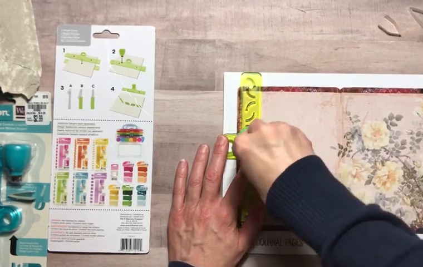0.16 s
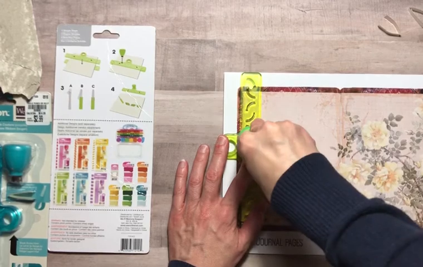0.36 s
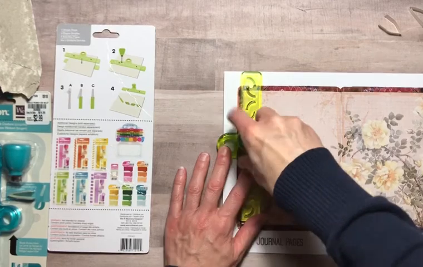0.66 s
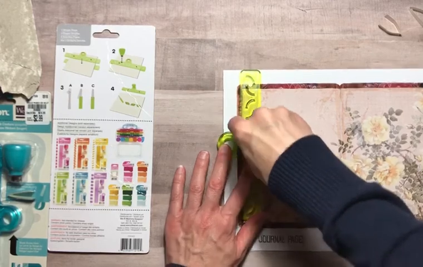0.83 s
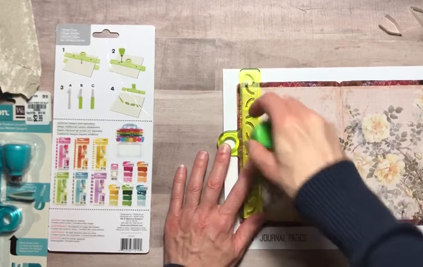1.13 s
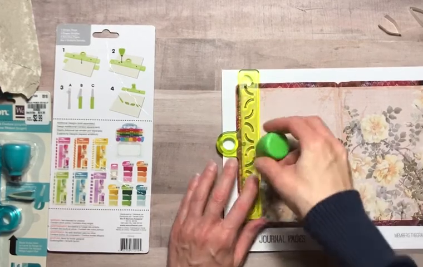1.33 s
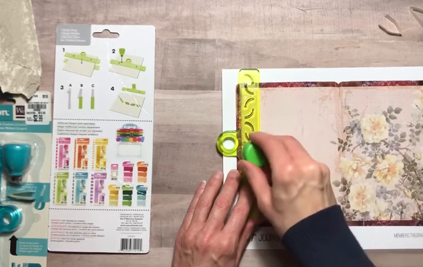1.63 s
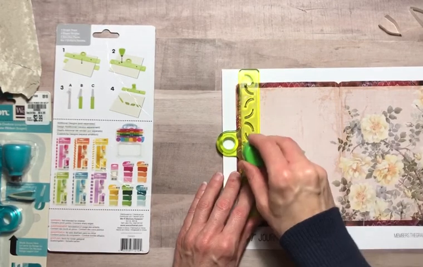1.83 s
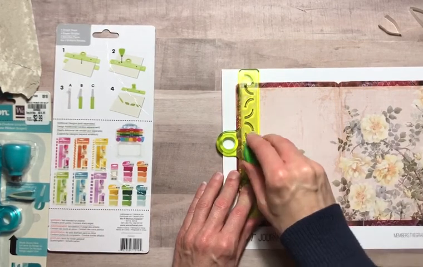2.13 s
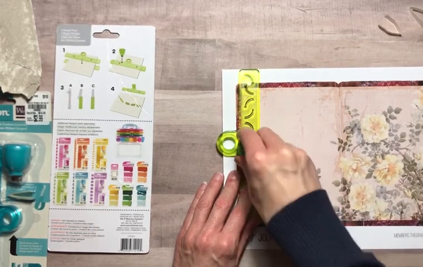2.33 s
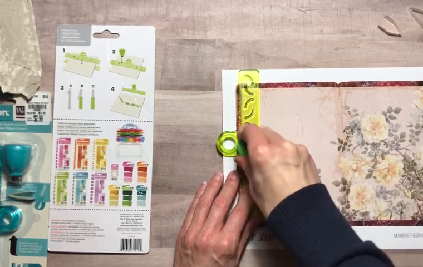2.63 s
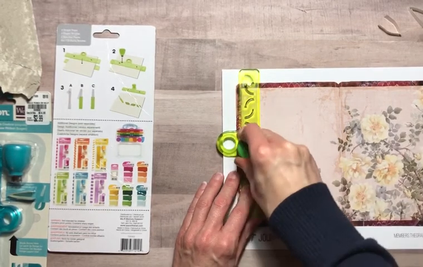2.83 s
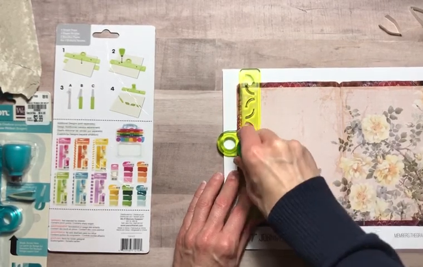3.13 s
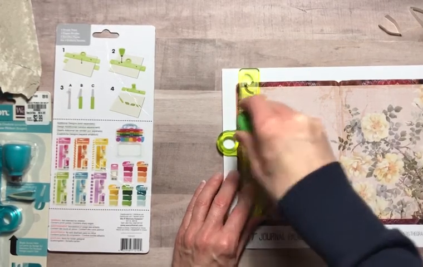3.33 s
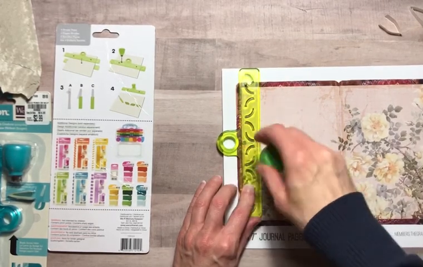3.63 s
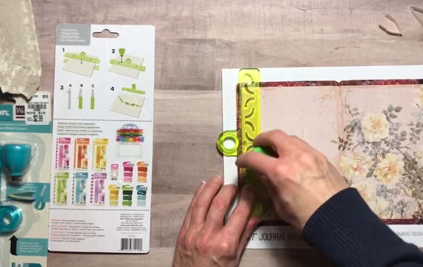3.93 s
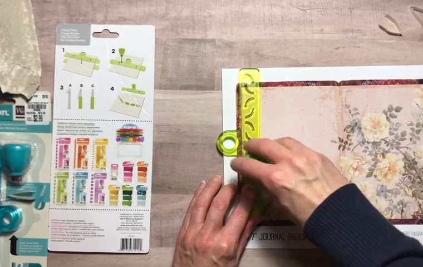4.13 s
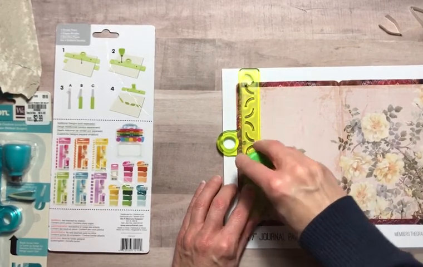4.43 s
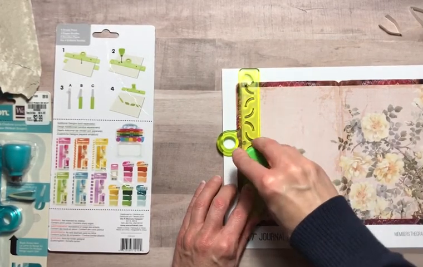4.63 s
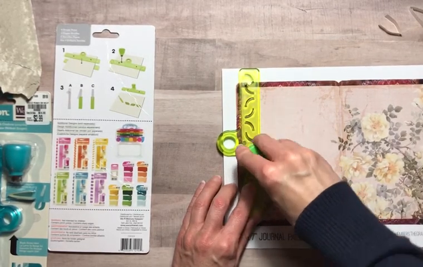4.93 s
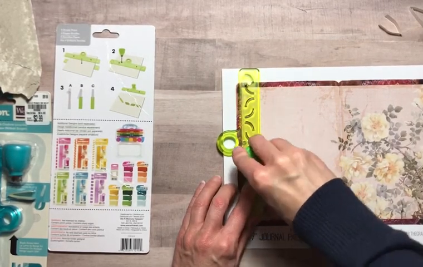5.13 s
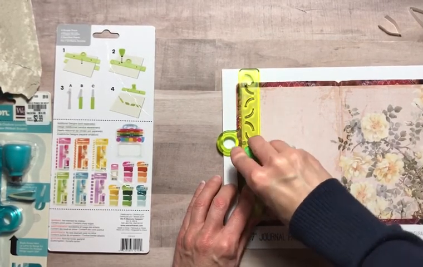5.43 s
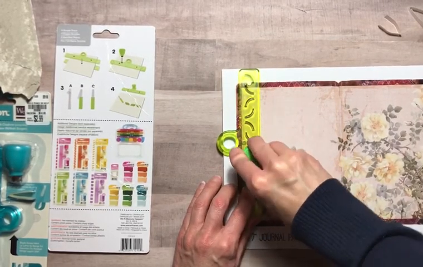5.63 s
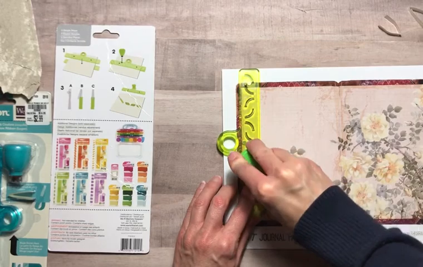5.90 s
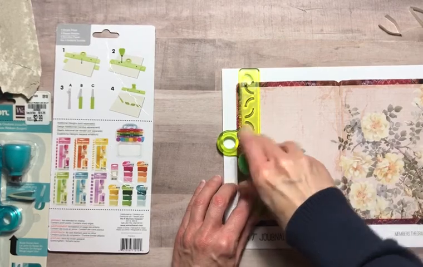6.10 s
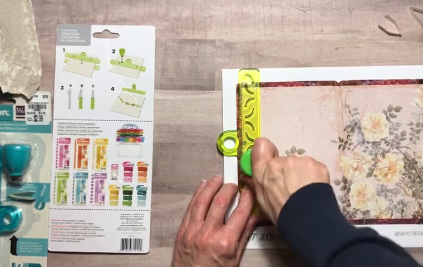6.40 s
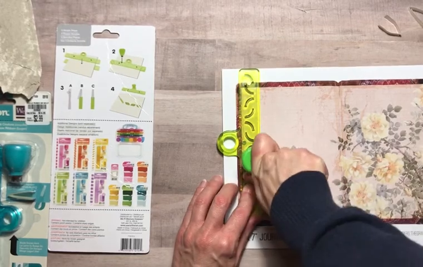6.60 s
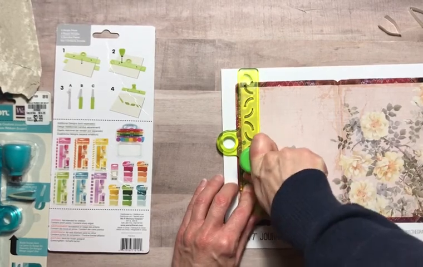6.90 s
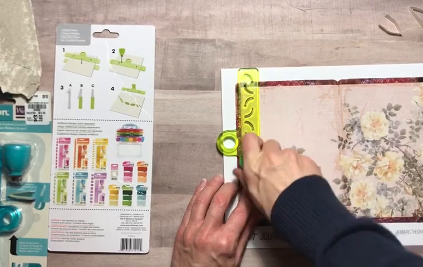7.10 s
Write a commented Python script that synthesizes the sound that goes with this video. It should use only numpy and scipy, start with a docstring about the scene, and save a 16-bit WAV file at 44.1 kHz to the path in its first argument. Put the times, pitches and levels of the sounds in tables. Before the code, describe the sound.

A hand punch snaps hard through thick paper three times on a table, with light plastic ticks, soft hand thuds and paper rustles between.

```python
"""Hand punch on a craft table

A hand punch is pressed three times through thick paper, close up: grainy noise crunches, then three contacts
of noise bursts and damped modes slam the tool onto the table, and a short diffuse tail makes a small room.
In between, the punch knocks in its plastic template (tick, ring and thud), hands bump the table, and paper
slides as band-shaped friction. Beneath lie low pushes of the table top, a hiss after each press and room tone."""
import sys
import numpy as np
from scipy import signal
from scipy.fft import rfft, irfft, next_fast_len
from scipy.io import wavfile

SR = 44100
rng = np.random.default_rng(int(sys.argv[2]) if len(sys.argv) > 2 else 0)


def master(y):
    """Save y as 16-bit WAV."""
    cut = np.clip(np.atleast_2d(y).T, -1, 1)
    pcm = np.round(cut * 32767)  # scale
    wavfile.write(sys.argv[1], SR, pcm.astype(np.int16))


N = 320166
AGE = np.arange(SR // 2) / SR  # time since a blow, s
TOP_HZ = 15800  # top of the band
ROOM_TONE_DB = -61.5
RING_T60_S, RING_FALL = 0.033, 1.05  # the plastic's decay at 1 kHz; it shortens as pitch to this power

# modes of punch, template and table top, relative levels [f/Hz, level/dB, t60/s]
BODY_MODES = [(134, -14, .3), (367.8, 1, 0.23), (518, -8, 0.15), (697, -6, 0.17), (888, -0.5, 0.22),
              (1026, 2.5, 0.23), (1080, -4, 0.058), (1859, -4.5, .2), (1870, -4.5, 0.2), (2080, -0.5, 0.23),
              (2140, 1, .17), (2220, -5, .16), (2613, -5.5, .16), (2672, -7.5, .16), (2899, -6, .16),
              (3630, -4, 0.092), (3940, -4, 0.096)]
# spectrum of the hard crack [f/Hz, level/dB]
CRACK_SPECTRUM = [(100, -22), (500, -7), (1000, -5), (2300, -3), (4000, 0), (5300, -7), (7000, -12),
                  (9300, -14), (11000, -18), (15500, -18)]
# spectrum of the tool rattling on after the crack [f/Hz, level/dB]
RATTLE_SPECTRUM = [(50, -11), (200, -9), (450, -7), (750, -7.5), (1000, 2), (1400, -2), (2200, 0.5),
                   (3200, -5), (5000, -10.5), (9000, -18.5), (15500, -26.5)]
# spectrum of the table thump under a press [f/Hz, level/dB]
THUMP_SPECTRUM = [(25, -17.5), (55, -5), (125, 1), (190, -2.5), (240, -1.5), (310, -11.5), (420, -9),
                  (700, -9), (1100, -22.5), (3000, -48.5), (12000, -67)]
# spectrum of a light tick [f/Hz, level/dB]
TICK_SPECTRUM = [(150, -10.5), (700, -3), (2000, 0), (4000, -10), (7000, -13), (15500, -12.5)]
# spectrum of a light thud in the table [f/Hz, level/dB]
THUD_SPECTRUM = [(25, -14.5), (70, -5), (170, 1), (300, -7.5), (600, -17.5), (1500, -31), (9000, -64)]
# spectrum of the still room [f/Hz, level/dB]
ROOM_TONE_SPECTRUM = [(12, -50), (23, -25), (45, 1), (80, -0.5), (135, 0.5), (290, -7.5), (360, -6.5),
                      (550, -15), (1100, -17.5), (1900, -27), (4000, -30), (8000, -35.5), (16000, -34.5)]
# spectrum of the hiss after a press [f/Hz, level/dB]
HISS_SPECTRUM = [(200, -7), (1000, 7.5), (2500, 4.5), (5000, 1), (10000, -3), (15500, -4)]
# reverberation of the room [f/Hz, t60/s]
ROOM_DECAY = [(100, 0.5), (400, 0.36), (1000, 0.35), (2200, .31), (4500, 0.23), (9000, 0.17), (15000, 0.21)]
# low pushes of the table top [t/s, level/dB, f/Hz]
TABLE_PUSHES = [(0.122, -40, 157), (0.231, -34, 80), (0.873, -44, 65.8), (2.74, -33, 55.6),
                (3.262, -51.5, 70.5), (6.724, -29, 61), (7.22, -39.5, 78)]
# modes of the plastic parts [multiple of the main ring, level/dB, share of its decay time]
PLASTIC_MODES = [(0.621, -12, 0.61), (1.0, 1, 1.0), (1.17, -16, .8), (1.48, -11.5, 0.47), (2.25, -17, 0.59)]
# presses of the punch [t/s when it hits bottom, crack level/dB, table thump level/dB, crunch length/s,
# gap between contacts/s, ring f/Hz on breaking through, on hitting bottom, on settling]
PUNCH_PRESSES = [ (0.2300, -7.5, -24.5, .012, 0.0022, 2720, 2300, 1770),
                 (2.7374, -8.5, -24.5, .003, .0017, 2295, 2270, 1070),
                 (6.7241, -10, -22.5, .026, 0.0034, 3510, 2040, 957), ]
# break through, hit bottom, settle: offsets from the press levels [crack/dB, ring/dB (from crack), thump/dB]
CONTACT_OFFSETS = [(-7.5, -9, -21.5), (1, -1, 2), (-13, -3, -7)]
# the punch taps its template [t/s, ring level/dB, ring f/Hz, tick level/dB, table thud level/dB]
TEMPLATE_TAPS = [ (0.4919, -52, 4390, -50, -77), (0.7561, -46, 960, -46, -45.5),
                 (0.889, -44, 1320, -53, -40.5), (0.902, -39.5, 1026, -47, -49),
                 (0.9835, -51, 1810, -55.5, -72), (1.49, -39.5, 4340, -49.5, -62),
                 (1.691, -38, 1357, -50, -47), (1.692, -37.5, 789, -69, -54.5),
                 (1.9097, -43.5, 895, -56.5, -49.5), (2.0698, -32, 2600, -30.5, -52.5),
                 (2.0716, -28.5, 1400, -33, -50), (2.4914, -41.5, 3080, -48.5, -62.5),
                 (2.522, -43, 2670, -47.5, -66.5), (2.6957, -33.5, 3360, -40.5, -66),
                 (3.258, -43.5, 916, -51, -50.5), (3.2671, -38.5, 925, -39.5, -40),
                 (3.28, -38.5, 920, -50, -44), (4.0668, -35, 883, -63, -53.5),
                 (4.669, -37.5, 909, -49.5, -45.5), (4.6876, -35, 937, -39.5, -49.5),
                 (5.2112, -48, 1606, -47, -58.5), (5.7669, -40, 1420, -62.5, -49),
                 (5.8439, -48, 2165, -45, -48.5), (6.107, -51.5, 1097, -50, -48),
                 (6.118, -48.5, 1413, -50.5, -48), (6.7139, -33.5, 4600, -33, -48), ]
# hands bump the table through the paper [t/s, thud level/dB, scuff level/dB]
HAND_BUMPS = [ (0.1158, -41, -49), (0.1295, -39, -49), (0.573, -47, -72), (0.73, -47.5, -73.5),
              (0.872, -44, -61), (2.41, -48, -60.5), (2.583, -47, -68.5), (2.8785, -44, -51.5),
              (2.95, -44, -55.5), (4.231, -47.5, -69.5), (5.528, -45.5, -70), (5.6137, -40.5, -61.5),
              (5.628, -40, -60.5), (5.638, -37, -69), (5.6544, -40, -62), (5.794, -44.5, -57.5),
              (5.809, -38, -66.5), (5.936, -40.5, -62.5), (6.5126, -49, -48.5), (7.218, -42.5, -55.5), ]
# paper and template slide [t/s at the middle, length/s, level/dB, centre f/Hz]
PAPER_SLIDES = [ (0.552, 0.16, -68, 3850), (0.881, 0.047, -57, 2013), (1.203, 0.27, -73, 3440),
                (1.412, 0.077, -65.5, 3020), (1.719, 0.12, -70.5, 6010), (2.398, 0.043, -66.5, 1994),
                (2.507, 0.079, -63.5, 2970), (2.68, .07, -66, 1800), (3.265, 0.025, -52.5, 2600),
                (3.504, 0.087, -62, 5160), (5.256, .027, -63.5, 1990), (5.768, 0.007, -56, 2400),
                (5.851, 0.017, -58, 2600), (6.142, 0.086, -73, 3970), ]


def amp(db):
    """Decibels to gain."""
    return 10 ** (np.asarray(db) / 20)


def unit(x):
    """Scale to rms 1."""
    return x / np.sqrt(np.mean(x ** 2))


def fade(t60):
    """Exponential decay, 60 dB down after t60."""
    return np.exp(-np.log(1000) * AGE / t60)


def at(hz, points):
    """Read (f/Hz, value) points on a log-frequency axis."""
    f, value = np.transpose(points)
    return np.interp(np.log(np.maximum(hz, 1)), np.log(f), value)


def colour(x, points):
    """Causal, minimum-phase filter with the given spectrum and a power gain of 1."""
    size = 2 * next_fast_len(len(x))
    gain = unit(amp(at(np.fft.rfftfreq(size, 1 / SR), points)))
    # folding the cepstrum onto positive time gives minimum phase
    cepstrum = irfft(np.log(gain))
    cepstrum[1:size // 2] *= 2
    cepstrum[size // 2 + 1:] = 0
    response = np.exp(rfft(cepstrum))
    return irfft(rfft(x, size) * response)[:len(x)]


def burst(points, t60, direct=0):
    """A blow on many crowded modes: a first pulse with the direct share of the energy, then dying noise."""
    envelope = fade(t60)
    noise = rng.standard_normal(len(AGE)) * envelope
    for _ in range(2):  # spread the energy evenly over the band, then rein in the late part
        spectrum = rfft(noise)
        noise = irfft(spectrum / np.abs(spectrum), len(AGE)) * np.minimum(1, 10 * envelope)
    pulse = np.sqrt(direct) * (AGE == 0)
    blow = pulse + np.sqrt(1 - direct) * noise / np.linalg.norm(noise)
    return colour(blow * np.linalg.norm(envelope), points)


def ring(hz, t60, rise_s=.0003):
    """One damped mode, pushed for a moment."""
    return np.sin(2 * np.pi * hz * AGE) * fade(t60) * (1 - np.exp(-AGE / rise_s))


def add(out, s, x):
    """Mix x into out from time s; what falls outside is dropped."""
    start = int(s * SR)
    x, start = x[max(-start, 0):], max(start, 0)
    out[start:start + len(x)] += x[:max(N - start, 0)]


def quiet():
    """Low rumble and thin hiss of the still room, swaying slightly."""
    sway = np.interp(np.arange(N), np.linspace(0, N, num=30), rng.standard_normal(size=30))
    return amp(ROOM_TONE_DB + 0.38 * sway) * colour(rng.standard_normal(N), ROOM_TONE_SPECTRUM)


def room(x, build_s=0.0034, tail_db=-12.0):
    """A short diffuse tail builds within milliseconds and decays by band; one dull inverted echo joins it."""
    noise = np.exp(2j * np.pi * rng.random(len(AGE) // 2 + 1))
    hz = np.fft.rfftfreq(len(AGE), 1 / SR)
    centres, t60s = np.transpose(ROOM_DECAY)
    tail = np.zeros(len(AGE))
    for band, t60 in zip(np.eye(len(ROOM_DECAY)), t60s):
        share = at(hz, np.c_[centres, band])  # bands crossfade into each other
        tail += irfft(noise * share, len(AGE)) * fade(t60)
    tail *= 1 - np.exp(-(AGE / build_s) ** 2)
    response = amp(tail_db) * tail / np.linalg.norm(tail)
    # a cluttered surface scatters the treble, so its echo at 6.5 ms is dull
    dull = np.hanning(9) / np.hanning(9).sum()
    add(response, .0065, -.17 * dull)
    return x + signal.fftconvolve(x, response)[:N]


def hiss(hold_s=0.418, release_s=0.014):
    """A faint even hiss hangs after each press hits bottom, then stops."""
    t = np.arange(N) / SR
    gates = [(t > s) * np.clip((s + hold_s - t) / release_s, 0, 1) for s, *_ in PUNCH_PRESSES]
    held = np.max(gates, axis=0)
    return amp(-65) * held * colour(rng.standard_normal(N), HISS_SPECTRUM)


def bounces():
    """Pushes sound the table top's low, heavily damped motion, one decaying sine each."""
    out = np.zeros(N)
    for s, db, hz in TABLE_PUSHES:
        add(out, s, amp(db) * ring(hz, t60=0.2, rise_s=0.0024))
    return out


def friction(hz, octaves, grain_db=4.5, grit_per_s=83.0, grit_db=19.0):
    """Dense tiny slips of uneven size in a broad band, with a few fibres that catch and tick; rms 1."""
    sizes = amp(grain_db * np.clip(rng.standard_normal(len(AGE)), -2, 2))
    # each grain size holds for 48 samples, about 1 ms
    slips = rng.standard_normal(len(AGE)) * np.repeat(sizes, 48)[:len(AGE)]
    ticks = amp(grit_db) * rng.standard_normal(len(AGE))
    grit = ticks * (rng.random(len(AGE)) < grit_per_s / SR)
    offset = np.log2((np.fft.rfftfreq(len(AGE), 1 / SR) + 1) / hz) / octaves
    return unit(irfft(rfft(slips + grit) / (1 + (2 * offset) ** 2), len(AGE)))


def stroke(s, length, hz, octaves):
    """Friction that swells and fades around time s."""
    out, t = np.zeros(N), AGE - AGE[-1] / 2
    add(out, s + t[0], friction(hz, octaves) * np.exp(-2 * (t / length) ** 2))
    return out


def slides():
    """Paper and template are shifted in short strokes of friction."""
    return sum(amp(db) * stroke(s, length, hz, octaves=3.4) for s, length, db, hz in PAPER_SLIDES)


def knock(ring_db, hz, tick_db, thud_db, chatter_db=-13.5, soft_db=1.5):
    """A light contact ticks, rings the plastic at the given pitch, and thuds in the table."""
    t60 = RING_T60_S * (1000 / hz) ** RING_FALL
    plastic = np.zeros(len(AGE))
    for ratio, db, share in PLASTIC_MODES:
        # modes further from the main ring stray more in pitch
        detune = 1 + .12 * rng.standard_normal() * np.log(ratio)
        plastic += amp(db) * ring(min(hz * ratio * detune, TOP_HZ), t60 * share, rise_s=0.00035)
    # the parts chatter as they settle, blurring the ring
    chatter = burst([(hz / 4, -16), (hz, 0), (hz * 4, -18), (hz * 12, -40)], t60=0.058)
    # low-ringing contacts are soft: above 1.3 times the ring their tick loses soft_db an octave
    soft_tick = [(f, db - soft_db * max(np.log2(f / (1.3 * hz)), 0)) for f, db in TICK_SPECTRUM]
    tick = burst(soft_tick, t60=0.01)
    thud = burst(THUD_SPECTRUM, t60=0.06, direct=0.4)
    rung = plastic + amp(chatter_db) * chatter
    return amp(ring_db) * rung + amp(tick_db) * tick + amp(thud_db) * thud


def bumps(ring_db=-11.5, ring_hz=1050, tick_db=7.5, scuff_lag_s=0.0035, scuff_s=.013):
    """A hand thuds on the table, which shakes the template; a nail ticks and skin scuffs the paper."""
    out = np.zeros(N)
    for s, thud_db, scuff_db in HAND_BUMPS:
        # ring_db is relative to the thud, tick_db to the scuff
        add(out, s, knock(thud_db + ring_db, ring_hz, scuff_db + tick_db, thud_db))
        out += amp(scuff_db) * stroke(s + scuff_lag_s, scuff_s, hz=2250, octaves=1.2)
    return out


def taps():
    """The punch is lifted out of the template and seated again, in light ringing contacts."""
    out = np.zeros(N)
    for s, ring_db, hz, tick_db, thud_db in TEMPLATE_TAPS:
        add(out, s, knock(ring_db, hz, tick_db, thud_db))
    return out


def crunches(crunch_db=-58.0, strain_db=-81.0, strain_times=4.0, growth=0.23):
    """Paper creaks, then its fibres tear; a slower push spreads the same energy over more time."""
    out = np.zeros(N)
    for s, _, _, length, gap, *_ in PUNCH_PRESSES:
        breaks, strain_s = s - gap, strain_times * length
        creak = stroke(breaks - strain_s, strain_s, hz=2600, octaves=3.3)
        out += amp(strain_db) / np.sqrt(length) * creak
        # tearing grows until the blade breaks through
        tearing = friction(hz=3150, octaves=1.9) * (AGE / length) ** growth * (AGE < length)
        add(out, breaks - length, amp(crunch_db) / np.sqrt(length) * tearing)
    return out


def contact(crack_db, ring_db, hz, thump_db, rattle_db=-17.5, body_db=-30.5):
    """One hard contact of the punch: a crack, a short ring, a thump, then tool and table ring on."""
    body = np.zeros(len(AGE))
    for f, db, t60 in BODY_MODES:
        # each contact strikes the modes at slightly different random levels and with random signs
        level_chance, sign_chance = rng.standard_normal(2)
        body += amp(db + .8 * level_chance) * np.sign(sign_chance) * ring(f, t60)
    crack = burst(CRACK_SPECTRUM, t60=0.0097, direct=0.1)
    rattle = burst(RATTLE_SPECTRUM, t60=0.15)
    thump = burst(THUMP_SPECTRUM, t60=0.067, direct=0.27)
    hard = crack + amp(rattle_db) * rattle + amp(body_db) * body
    return amp(crack_db) * hard + amp(ring_db) * ring(hz, t60=0.018) + amp(thump_db) * thump


def snaps():
    """The blade breaks through, hits bottom and settles: three contacts a few milliseconds apart."""
    out = np.zeros(N)
    for s, db, thump_db, _, gap, *pitches in PUNCH_PRESSES:
        times = (s - gap, s, s + gap)
        for when, hz, (crack, rung, thump) in zip(times, pitches, CONTACT_OFFSETS):
            add(out, when, contact(db + crack, db + rung, hz, thump_db + thump))
    return out


def scene():
    """Punching and handling in the room, over the table pushes, hiss and room tone, which stay dry."""
    table = snaps() + crunches() + taps() + bumps() + slides()
    return (room(table) + bounces() + hiss() + quiet())[None]


def record(dry):
    """The microphone rounds the highest peaks a little, sheds the deepest bass and cuts the top."""
    rounded = 1.3 * np.tanh(dry / 1.3)
    thin = signal.sosfilt(signal.butter(2, 30, "highpass", fs=SR, output="sos"), rounded)
    return signal.sosfilt(signal.ellip(8, .2, 70, TOP_HZ, fs=SR, output="sos"), thin)


dry = scene()
out = record(dry)
master(out)
```